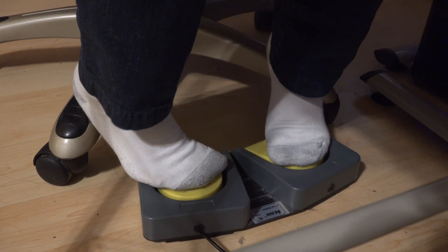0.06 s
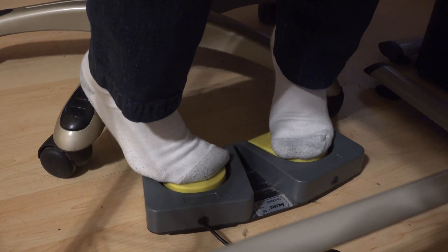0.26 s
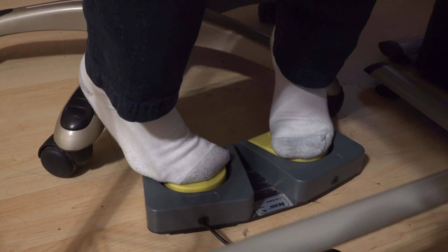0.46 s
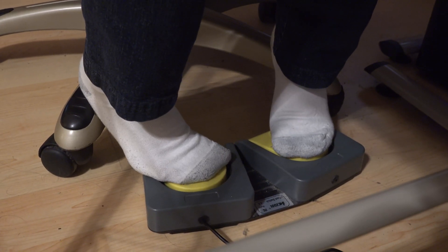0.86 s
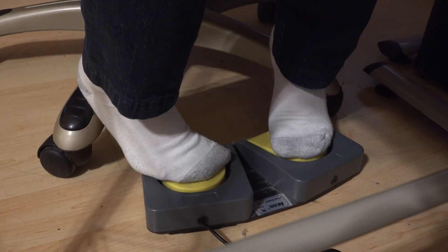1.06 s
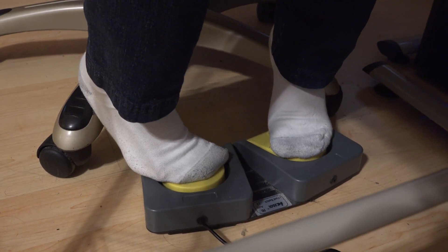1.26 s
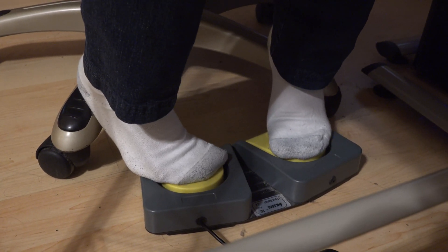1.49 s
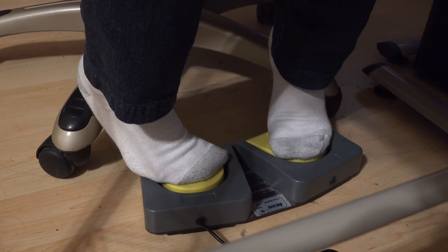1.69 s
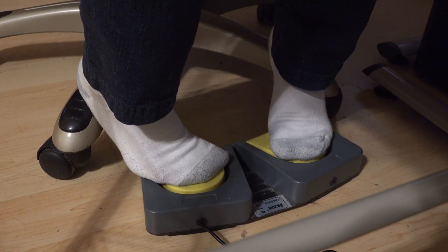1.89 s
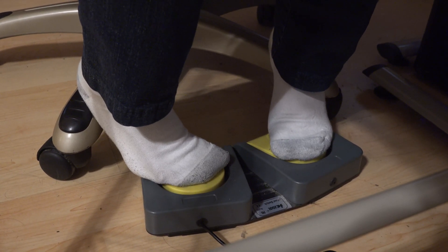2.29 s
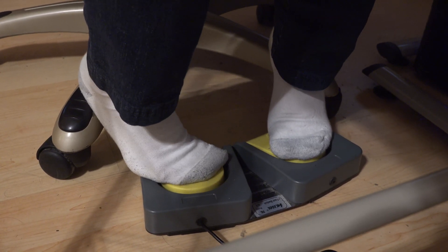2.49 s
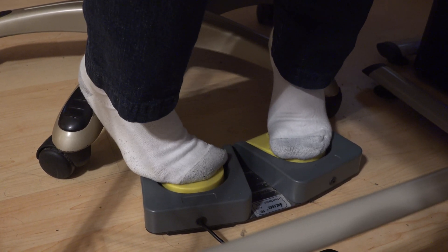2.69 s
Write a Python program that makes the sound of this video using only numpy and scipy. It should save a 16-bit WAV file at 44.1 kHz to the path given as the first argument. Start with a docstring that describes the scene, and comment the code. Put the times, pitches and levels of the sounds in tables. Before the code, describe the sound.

A plastic foot switch clicks sharply, pressed at about 0.25, 1.2 and 2.5 seconds and released at 0.65 and 1.9 seconds. Each snap has a faint spring ring and a short room echo. Light pedal ticks, knocks or a soft sock rub come just before the presses, and the first press lands with a deep thud on the wooden floor. A soft fan-like hum runs underneath.

```python
"""A small room with a wooden floor, where a foot in a sock works a plastic foot switch.
Three presses and two releases: each snap cracks, rings the housing and, faintly, its spring.
Before a press the pedal rubs, ticks or knocks; the first press lands with a deep thud.
The room echoes the switch and pedal, over a soft fan-like hum."""
import sys
import numpy as np
from scipy import signal
from scipy.fft import irfft, next_fast_len
from scipy.io import wavfile
from scipy.ndimage import uniform_filter1d

SR = 44100
rng = np.random.default_rng(int(sys.argv[2]) if len(sys.argv) > 2 else 0)


def transcribe(u):
    """Save the signal u as a 16-bit wav file named by the first command-line argument.

    u: samples, shape (n,) or (channels, n), limited to [-1, 1]; the rate is SR.
    q: integer samples, one column per channel.
    """
    v = np.clip(np.atleast_2d(u).T, -1, 1)
    q = np.round(v * 32767).astype(np.int16)
    wavfile.write(sys.argv[1], SR, q)


N = 125685
ATTACK_S = 0.0015  # rise time of ticks and rings; a "t60" is the time to fade by 60 dB

# stereo width of the switch and pedal: f/Hz, side against middle/dB
SWITCH_WIDTH = [(200, -50), (1500, -33.5), (2800, -14.5), (4500, -9.5), (9000, -5.5), (16000, -9)]
# stereo width of the room's air and echo: f/Hz, side against middle/dB
ROOM_WIDTH = [(30, -11), (500, -13.5), (1500, -12.5), (4000, -3.5), (12000, 1)]


def undb(db):
    """Turn decibels into a gain."""
    return 10 ** (np.asarray(db) / 20)


def gain_at(curve, hz):
    """Read a gain from a curve of f/Hz, level/dB points."""
    f, db = np.array(curve, float).T
    return undb(np.interp(np.log(np.maximum(hz, 1)), np.log(f), db))


def tilt(hz, db_per_octave):
    """Level change in dB that brightens or dulls a sound, pivoting at 5000 Hz."""
    return db_per_octave * np.log2(hz / 5000)


def tilted(colour, db_per_octave):
    """Make a colour (the level at each frequency) brighter or duller."""
    return [(hz, db + tilt(hz, db_per_octave)) for hz, db in colour]


def noise(colour, width, size, pitch=1):
    """Stereo noise: both ears share the middle, and get the side with opposite signs."""
    hz = np.fft.rfftfreq(size, 1 / SR)
    phases = np.exp(2j * np.pi * rng.random((2, len(hz))))
    mid, side = phases * gain_at(colour, hz / pitch) * (hz > 0)
    side = side * gain_at(width, hz)
    return irfft(np.array([mid + side, mid - side]), size) / irfft(mid, size).std()


def fade(t, attack, t60):
    """Rise quickly, then die away."""
    return np.clip(t / attack, 0, 1) * np.exp(-np.log(1000) * np.maximum(t - attack, 0) / t60)


def add(out, start, sound):
    """Mix a sound in at a start time in seconds."""
    i = max(int(start * SR), 0)
    out[:, i:i + sound.shape[-1]] += sound[..., :max(N - i, 0)]


def ring(tones, t, column=0, tilt_db=0):
    """A struck part's fading tones; the higher ones reach left and right out of step."""
    out = 0
    for hz, t60, *levels in tones:
        lag = np.arctan(gain_at(SWITCH_WIDTH, hz)) * rng.choice([-1, 1]) * np.array([[1], [-1]])
        wave = np.sin(2 * np.pi * (hz * t + rng.random()) + lag)
        out = out + undb(levels[column] + tilt(hz, tilt_db)) * fade(t, ATTACK_S, t60) * wave
    return out


def background():
    """A steady low rush of room air with a few wavering hum tones."""
    # colour of the air: f/Hz, level/dB
    air = [(12, -1.5), (25, -14), (38, -0.5), (50, -14.5), (70, -12.5), (100, -15.5), (170, -17),
           (360, -17.5), (640, -21), (1030, -21.5), (1500, -28.5), (2000, -31.5), (4500, -39.5),
           (8000, -44), (16000, -46.5)]
    # hum tones: f/Hz, level/dB
    hum = [(68, -57.5), (121, -60.5), (198, -65), (236, -62.5), (356, -61), (393, -64)]
    t = np.arange(N) / SR
    out = undb(-49) * noise(air, ROOM_WIDTH, next_fast_len(N))[:, :N]
    for hz, db in hum:
        drift = np.cumsum(rng.standard_normal(N)) / np.sqrt(SR)
        out += undb(db) * np.sin(2 * np.pi * hz * t + 3.36 * drift)
    return out


def sock_rubs():
    """The sock rubs on the pedal with a grainy rustle."""
    # rubs: t/s, length/s, level/dB
    rubs = [(0, 0.3, -54), (2.353, 0.1, -50.5), (2.469, .08, -47)]
    # colour of a rub: f/Hz, level/dB
    colour = [(200, 2.5), (400, -7), (700, 1.5), (1100, 1.5), (1600, -4.5), (2500, -10.5), (4000, -14),
              (7000, -16.5), (10000, -24), (16000, -40)]
    out = np.zeros((2, N))
    for start, length, db in rubs:
        rustle = noise(colour, SWITCH_WIDTH, SR)
        grain = uniform_filter1d(rng.standard_normal(SR), size=300)
        rustle *= undb(3.6 * grain / grain.std())  # the level flickers
        swell = signal.windows.tukey(int(length * SR), .5)
        add(out, start, undb(db) * rustle[:, :len(swell)] * swell)
    return out


def pedal_ticks():
    """The loose pedal ticks lightly as it takes up its slack."""
    # ticks: t/s, level/dB, t60/s, tilt/(dB per octave)
    ticks = [(0.016, -51.5, 0.36, 1), (0.0886, -53, 0.051, 1), (0.1192, -41, 0.078, 1),
             (.1865, -51, .03, 2.5), (0.2021, -36.5, 0.04, 1.5), (0.407, -48, .03, 0),
             (0.5462, -46.5, 0.11, -1.5), (0.7126, -48, .03, 4), (1.066, -46.5, 0.059, 0),
             (1.1161, -43.5, 0.026, 5.5), (1.1572, -40.5, 0.042, -1), (1.1693, -38.5, .04, 3.5),
             (2.056, -53, 0.033, -1), (2.2016, -56, 0.026, -3), (2.381, -43.5, 0.043, 0),
             (2.4193, -45, 0.032, 0), (2.4757, -40, 0.038, 0.5), (2.506, -41.5, 0.045, 3),
             (2.7654, -57, .03, 14)]
    # colour of a tick: f/Hz, level/dB
    colour = [(500, 11), (1200, -7.5), (2500, -9.5), (4000, -1.5), (6000, -8.5), (8500, -8), (11000, -16.5),
              (16000, -31)]
    out, t = np.zeros((2, N)), np.arange(SR // 5) / SR
    for start, db, t60, tilt_db in ticks:
        hiss = noise(tilted(colour, tilt_db), SWITCH_WIDTH, len(t))
        add(out, start, undb(db) * hiss * fade(t, ATTACK_S, t60))
    return out


def case_knocks():
    """The case knocks on the floorboards: a dull ring and a puff of noise."""
    # knocks: t/s, level/dB, pitch factor
    knocks = [(.184, -42.5, 1.12), (.204, -37.5, 1.21), (1.105, -45.5, 1.286), (1.153, -39, 1.12),
              (1.158, -38, 1.2), (1.1745, -35, 1.026), (2.203, -43.5, 1.2), (2.381, -41, 0.91),
              (2.509, -40, 2), (2.5589, -34, 0.97)]
    # colour of the contact, before the pitch factor: f/Hz, level/dB
    colour = [(120, -47), (350, -1.5), (600, -7), (750, 2.5), (900, -1.5), (1100, -8.5), (1600, -8.5),
              (3000, -17), (8000, -53)]
    # tones of the case on the boards, before the pitch factor: f/Hz, t60/s, level/dB
    boards = [(330, 0.077, -14), (518, 0.052, -4.5), (796, 0.046, 0), (908, .045, -4)]
    out, t = np.zeros((2, N)), np.arange(SR // 5) / SR
    for start, db, pitch in knocks:
        contact = noise(colour, SWITCH_WIDTH, len(t), pitch) * fade(t, attack=0.0026, t60=0.036)
        add(out, start, undb(db) * (ring(boards, t * pitch) + undb(-1) * contact))
    return out


def floor_thud():
    """The sole touches softly, then the foot's weight shakes the floor; deep tones last longest."""
    # the sole's first touch: t/s, f/Hz, t60/s, level/dB
    touch = (.238, 118, .09, -37)
    # deep tones of the floor: f/Hz, t60/s, level/dB
    floor = [(68, 0.24, -30.5), (37, 0.64, -30.5), (13.5, 1, -34)]
    landing_s = .256
    out, t = np.zeros((2, N)), np.arange(SR) / SR
    for start, hz, t60, db in [touch] + [(landing_s, *tone) for tone in floor]:
        add(out, start, undb(db) * np.sin(2 * np.pi * hz * t) * fade(t, attack=0.0064, t60=t60))
    return out


def crack(colour):
    """The contact chatters for a moment, then the noise dies fast, the treble first."""
    rise_s, chatter_s, treble_hz = 0.00073, 0.0015, 9600
    body_t60, treble_t60 = 0.035, 0.014
    t = np.arange(SR // 20) / SR
    burst = noise(colour, SWITCH_WIDTH, len(t)) * np.minimum(t / rise_s, 1)
    treble = signal.sosfiltfilt(signal.butter(2, treble_hz, "high", fs=SR, output="sos"), burst)
    dying = -np.log(1000) * np.maximum(t - rise_s - chatter_s, 0)
    return (burst - treble) * np.exp(dying / body_t60) + treble * np.exp(dying / treble_t60)


def switch_snaps():
    """Each snap cracks, rings the housing briefly and leaves the spring ringing faintly."""
    # snaps going down, and springing back: t/s, level/dB, tilt/(dB per octave)
    presses = [(.2503, -.5, -0.5), (1.2211, 0, -0.5), (2.5456, 0.9, -0.5)]
    releases = [(.6547, -1, 0.5), (1.8667, -0.5, 1)]
    # colours of their cracks: f/Hz, level/dB
    press_colour = [(200, -29), (700, -18), (1200, -7), (2000, -8), (3200, -4), (4800, 0.5), (7500, -5.5),
                    (9300, 1), (10500, -13), (15000, -4.5), (16500, -23)]
    release_colour = [(200, -35), (700, -15), (1200, -3), (2000, -10), (3200, -2), (4500, 1.5),
                      (6000, -7.5), (8500, -2.5), (10500, -6.5), (13000, -3.5), (16500, -27)]
    # tones of the housing and spring: f/Hz, t60/s, press level/dB, release level/dB
    housing = [(1471, 0.039, -9, -7.5), (1596, 0.045, -11.5, -20), (1930, 0.052, -8, -10.5),
               (2617, 0.053, -13.5, -13.5), (3954, 0.023, -5, 1.5), (4340, 0.066, -4, -10),
               (4674, 0.016, 1, -30), (4933, 0.02, -1, -3.5), (5290, 0.016, -5, -14), (5400, 0.024, 4, -7),
               (5780, 0.045, -6, -14), (6600, 0.08, -21.5, -15), (7050, 0.041, -6.5, -32),
               (8240, 0.022, -34, -3), (9484, 0.017, 0, -3), (11230, 0.033, -13.5, -10),
               (11690, 0.0092, -11, -9)]
    spring = [(4436, .33, -5, -20), (4570, .33, -5, -14), (4786, .18, -12, 0), (4935, .5, -10, -2),
              (6505, .16, 1, 8), (7472, .26, -11, -20), (9200, .24, -14, -20)]
    crack_db, housing_db, spring_db = -22, -23.5, -49
    cracks, rings = np.zeros((2, N)), np.zeros((2, N))
    short, long = np.arange(SR // 10) / SR, np.arange(SR // 3) / SR
    for column, (snaps, colour) in enumerate([(presses, press_colour), (releases, release_colour)]):
        for start, db, tilt_db in snaps:
            add(cracks, start, undb(db + crack_db) * crack(tilted(colour, tilt_db)))
            add(rings, start, undb(db + housing_db) * ring(housing, short, column, tilt_db))
            add(rings, start, undb(db + spring_db) * ring(spring, long, column))
    return cracks, rings


def room_echo(sound):
    """The room gives a short blurred echo, with a second swell from the far walls."""
    # colour of the echo: f/Hz, level/dB
    colour = [(100, -4), (1000, 4.5), (2000, 3.5), (5000, 1), (9000, -1.5), (16000, -10)]
    near_t60, far_t60, far_delay_s = 0.15, 0.45, 0.03
    t = np.arange(SR // 2) / SR
    near = undb(-17.5) * fade(t, 0.01, near_t60) / np.sqrt(near_t60)
    far = undb(-19) * fade(t - far_delay_s, 0.0023, far_t60) / np.sqrt(far_t60)
    tail = noise(colour, ROOM_WIDTH, len(t)) * np.hypot(near, far) * np.sqrt(np.log(1000) / SR)
    return signal.fftconvolve(sound, tail, axes=1)[:, :N]


def switch_echo(directions):
    """The switch sends a different mix of its tones in each direction; the room blends them."""
    out = 0
    for _ in range(directions):
        cracks, rings = switch_snaps()
        out = out + room_echo(cracks + undb(-6.5) * rings)  # rings reach the room less than cracks
    return out / np.sqrt(directions)


def scene():
    """The pedal and switch with their echoes, over the thud and the hum."""
    pedal = pedal_ticks() + case_knocks() + sock_rubs()
    cracks, rings = switch_snaps()
    echoes = room_echo(pedal) + switch_echo(directions=3)
    lean_left = undb([[0.4], [-0.4]])
    return pedal + cracks + rings + echoes + (floor_thud() + background()) * lean_left


def record(dry):
    """Cut away the very highest treble."""
    top_hz = 16200
    return signal.sosfilt(signal.ellip(8, .2, 80, top_hz, fs=SR, output="sos"), dry)


dry = scene()
out = record(dry)
transcribe(out)
```